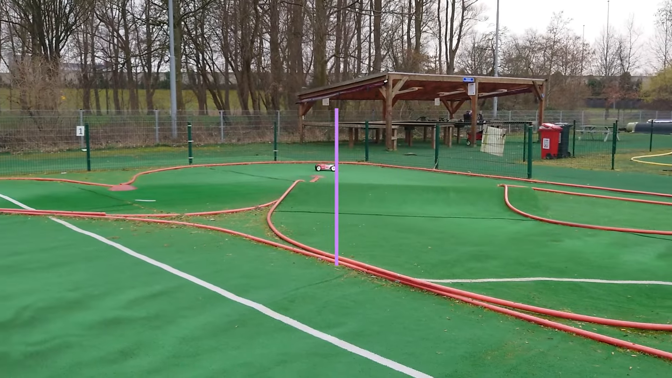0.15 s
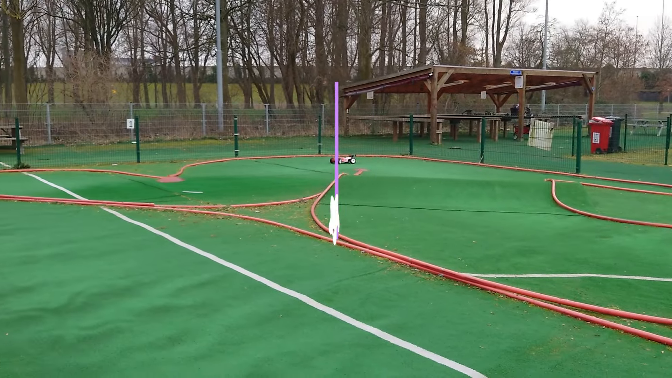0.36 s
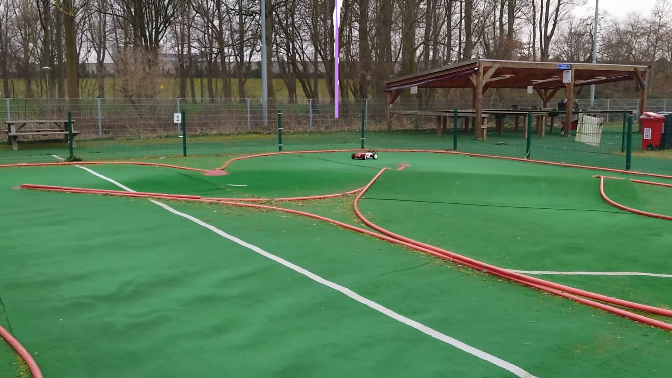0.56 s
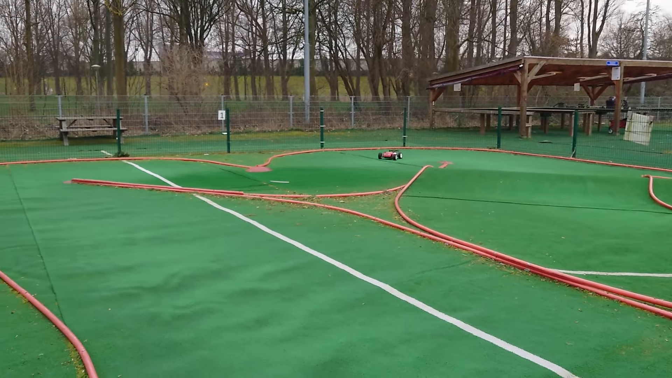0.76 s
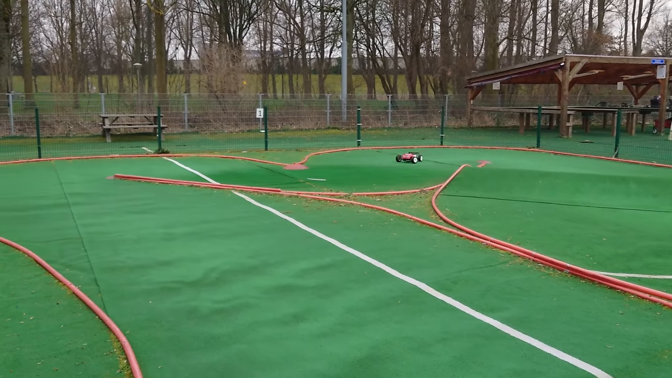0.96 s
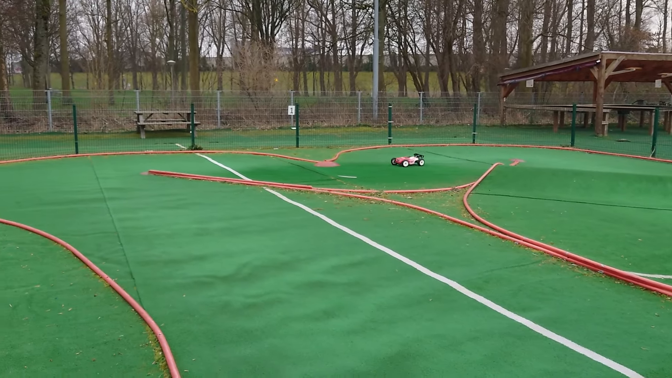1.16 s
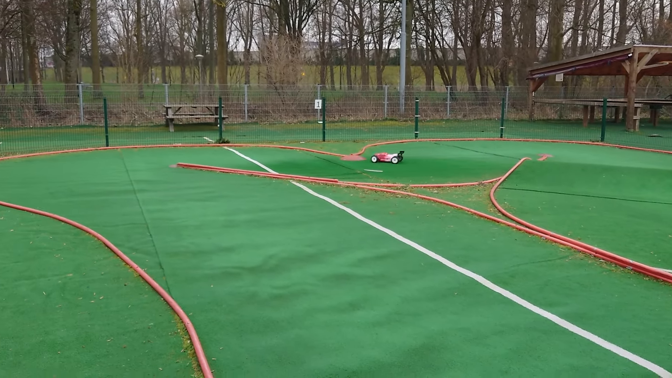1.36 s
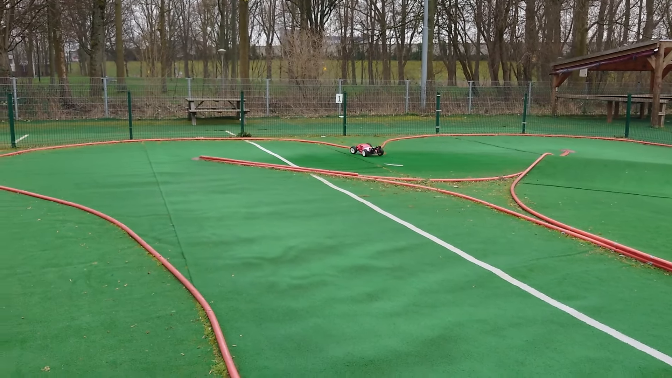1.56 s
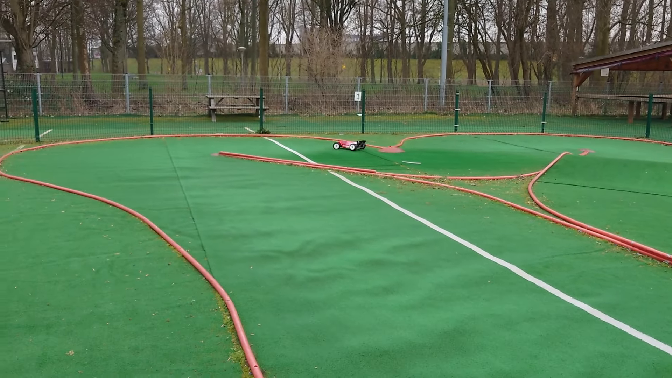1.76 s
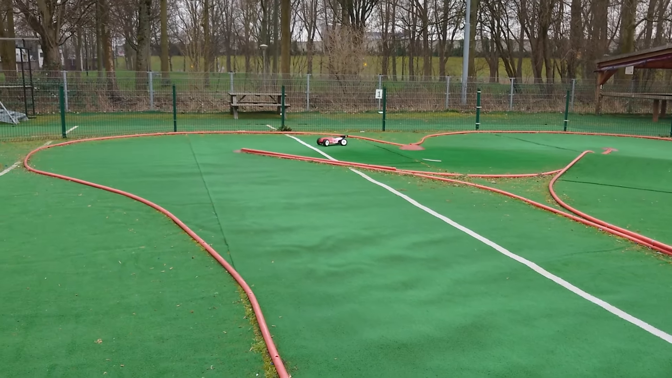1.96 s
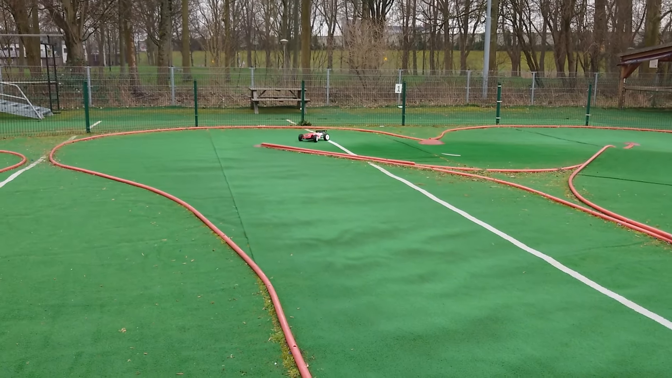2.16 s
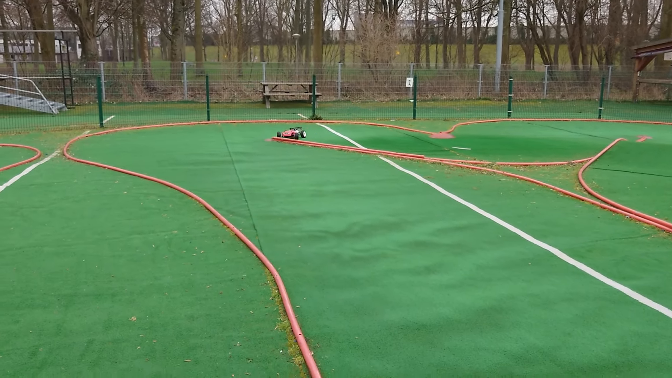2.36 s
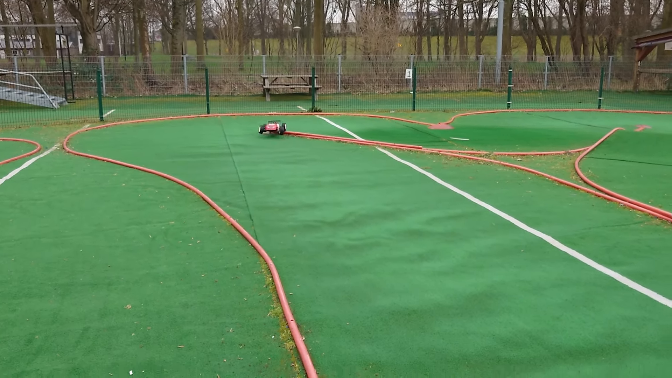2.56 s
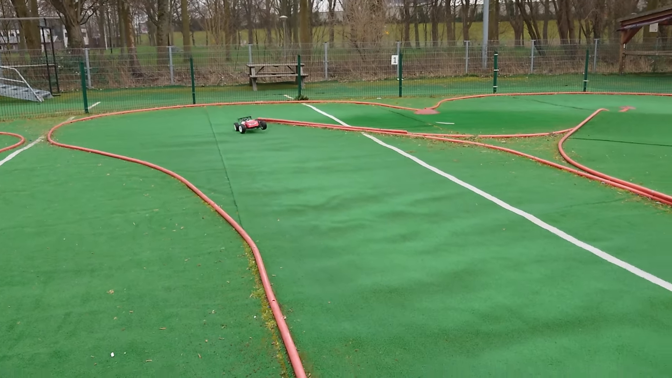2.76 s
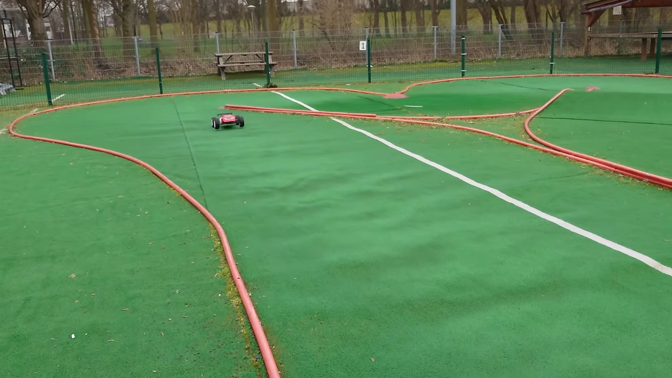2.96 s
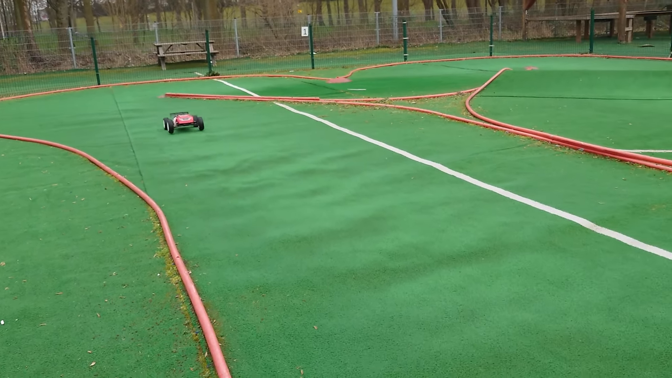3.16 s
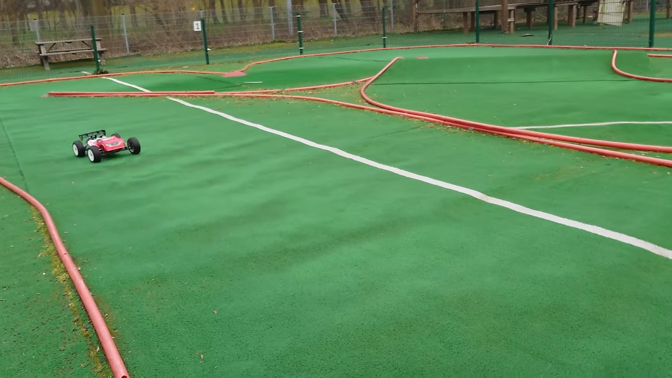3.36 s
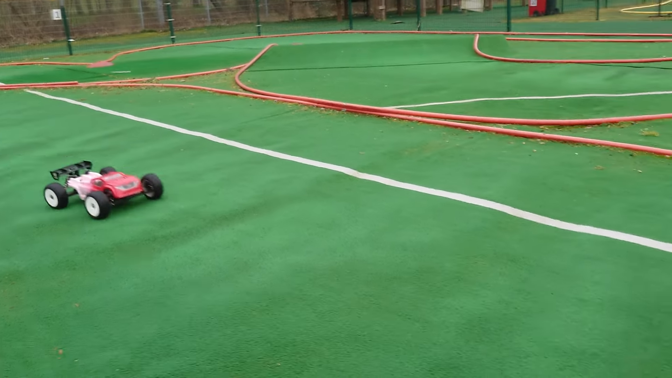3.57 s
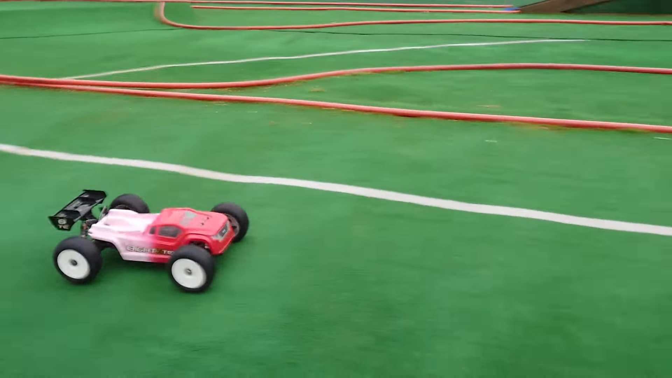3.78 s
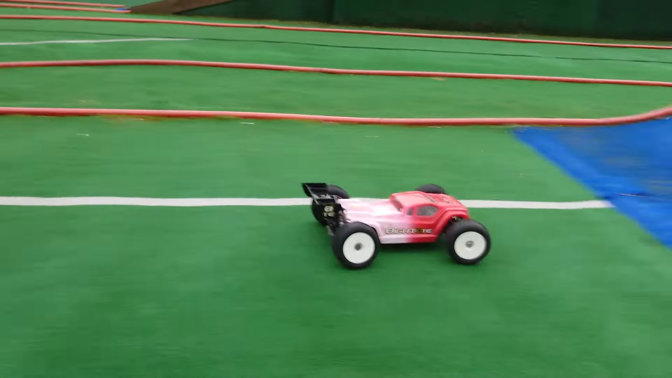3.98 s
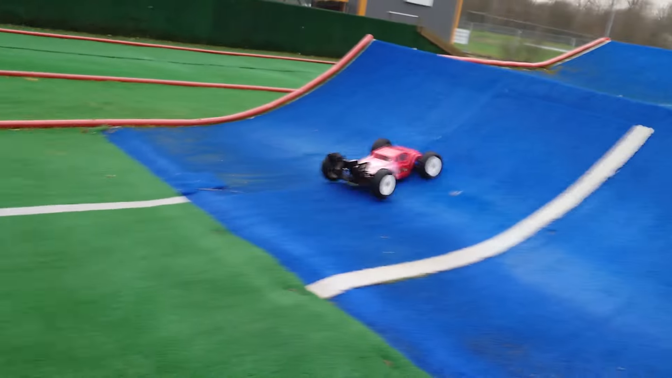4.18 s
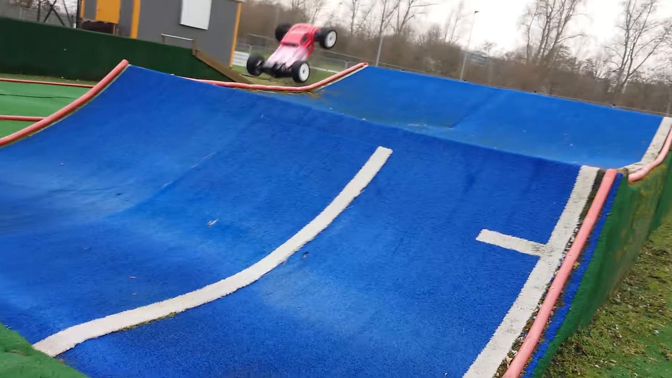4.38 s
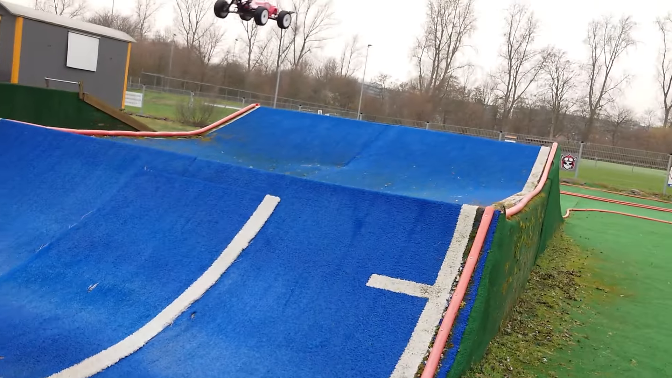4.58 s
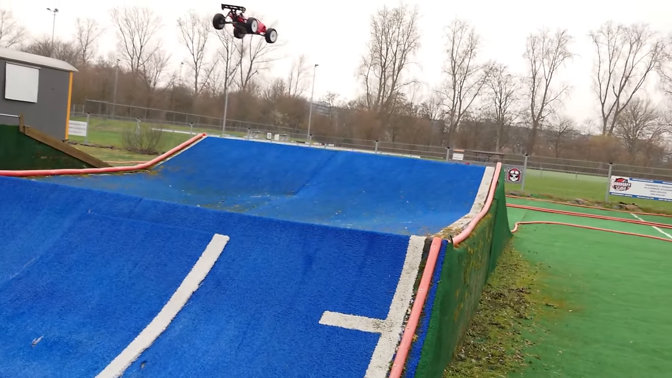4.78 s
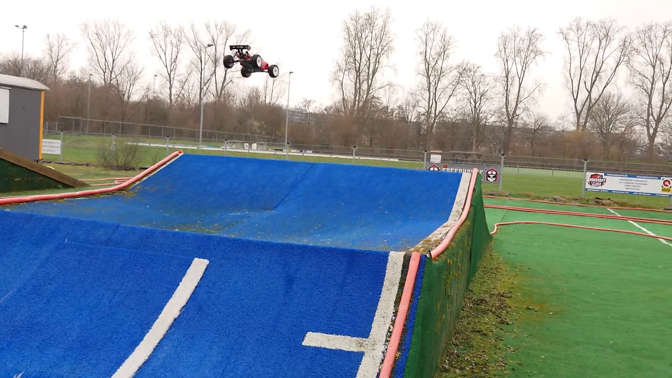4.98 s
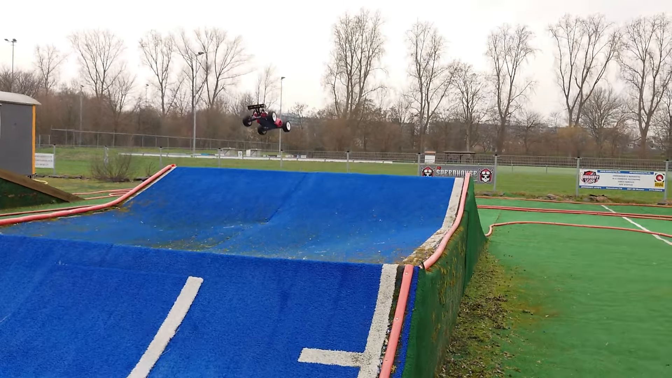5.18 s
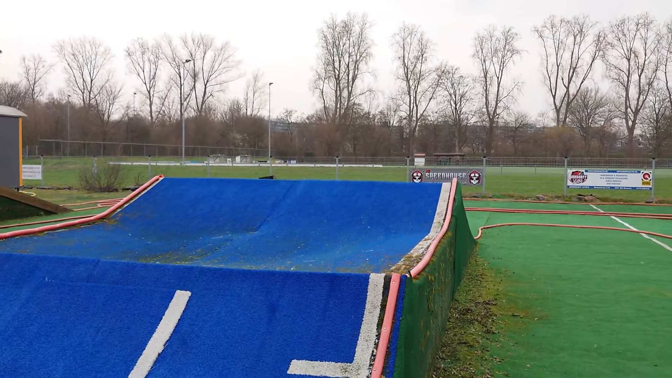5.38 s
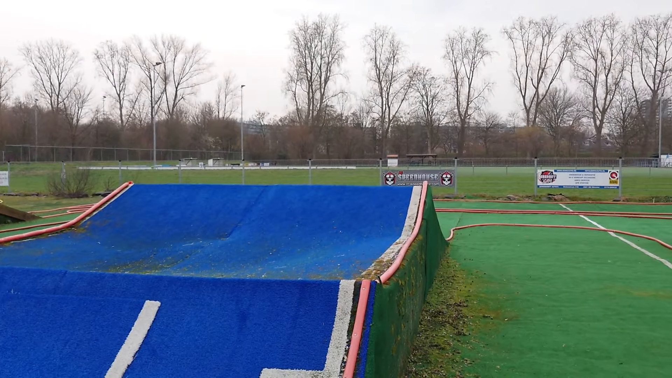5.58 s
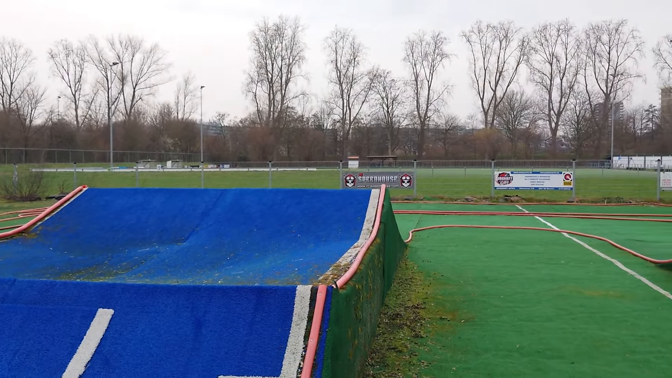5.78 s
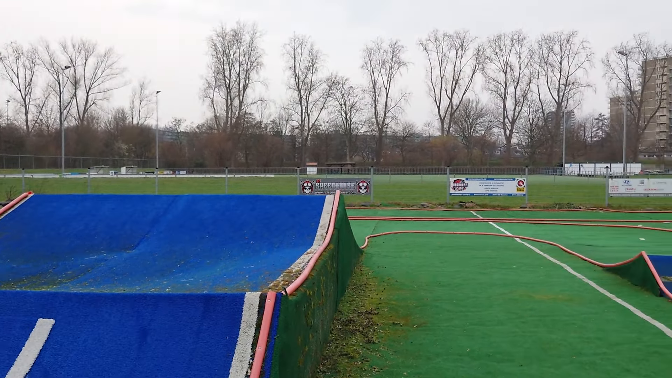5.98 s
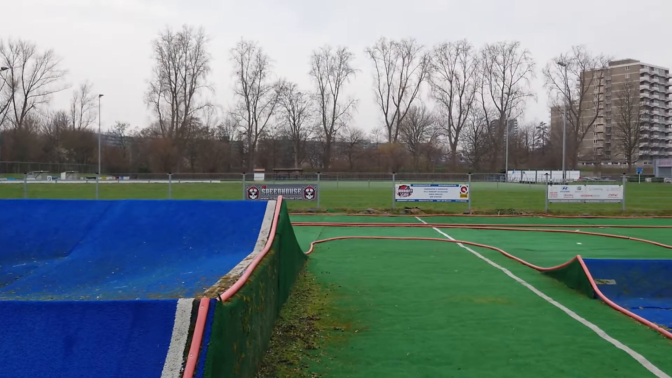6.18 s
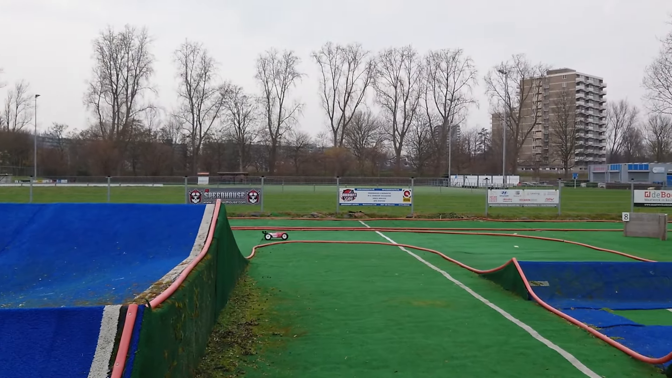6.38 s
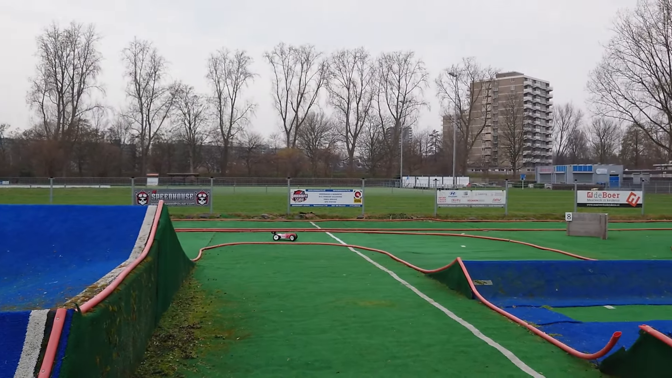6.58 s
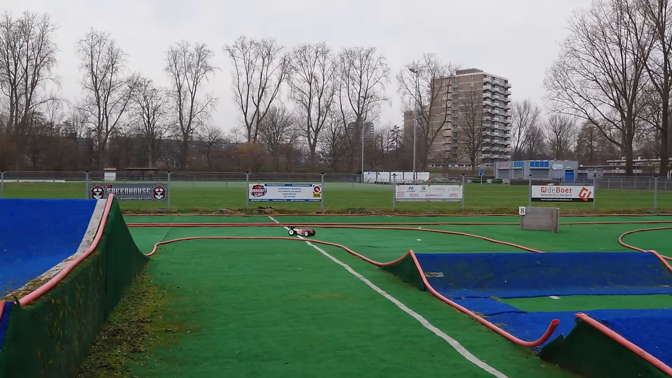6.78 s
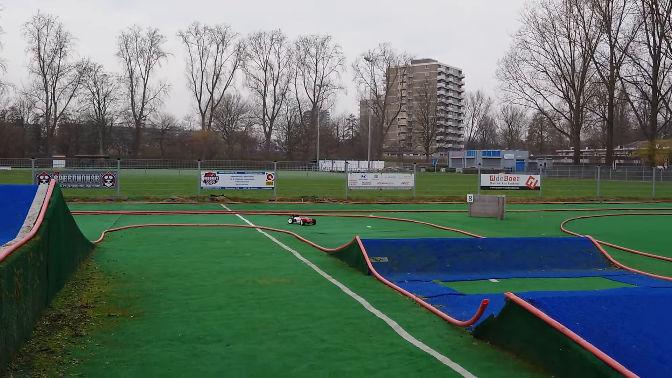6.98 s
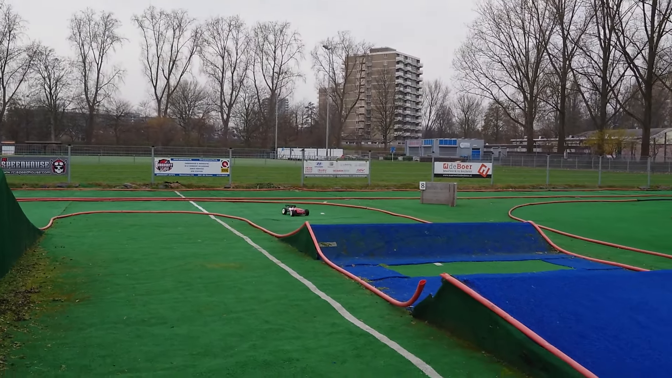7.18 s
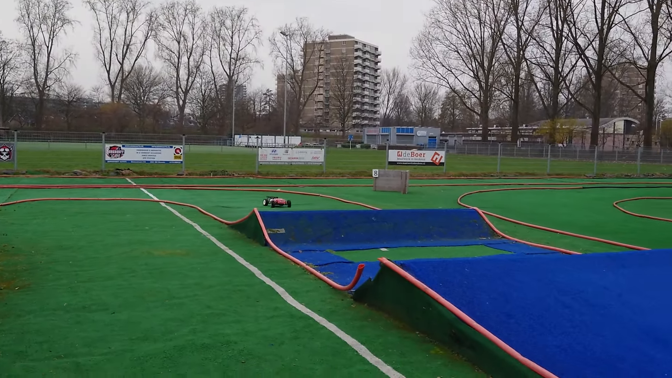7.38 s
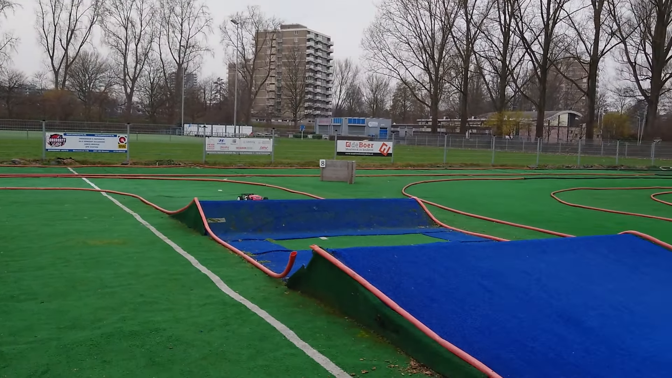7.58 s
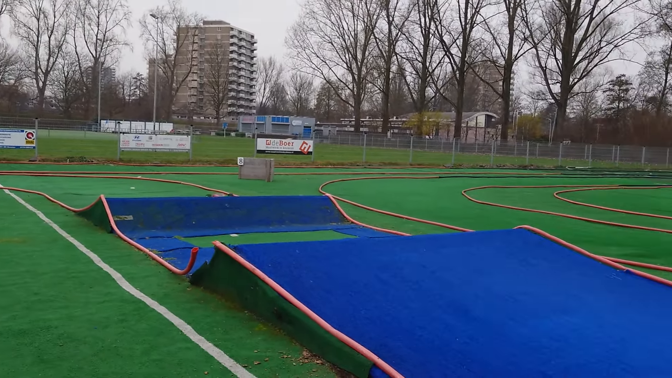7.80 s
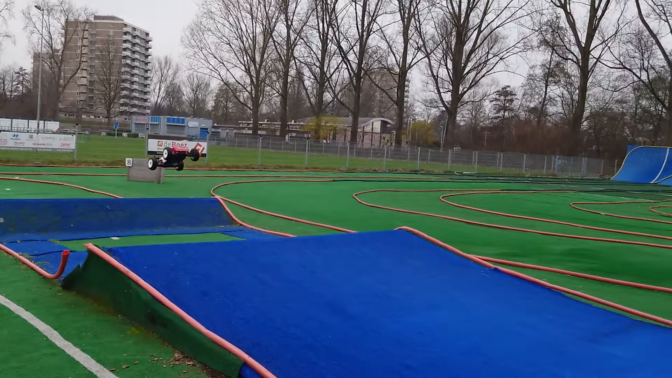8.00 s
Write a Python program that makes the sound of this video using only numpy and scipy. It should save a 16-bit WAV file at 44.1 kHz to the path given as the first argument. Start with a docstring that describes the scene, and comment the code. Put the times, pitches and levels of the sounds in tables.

```python
"""An electric model truck laps a carpeted outdoor track: it squirts through far corners, races past,
thumps up a wooden ramp, blips its motor in the air, lands and comes round again.
Its whine is gliding harmonics of the tooth rates; clicks and filtered grains make gears, shell and tyres.
Decaying modes ring the shell and ramp boards; shaped noise is the slap of landings and a distant town."""
import sys
import numpy as np
from scipy import signal
from scipy.fft import rfft, irfft, next_fast_len
from scipy.io import wavfile
from scipy.ndimage import map_coordinates

SR = 44100
rng = np.random.default_rng(int(sys.argv[2]) if len(sys.argv) > 2 else 0)


def wav_record(signal):
    """Record a signal, one row per channel, as 16-bit PCM in the file named by sys.argv[1]."""
    frames = np.transpose(np.atleast_2d(signal))
    bounded = np.clip(frames, -1, 1)
    # unit amplitude maps onto the largest positive 16-bit level
    quanta = np.round(bounded * 32767).astype(np.int16)
    wavfile.write(sys.argv[1], SR, quanta)


N = 354563
TIME = np.arange(N) / SR  # s

# Squeezes of throttle or brake, plus one short treble tick of the servo or suspension at 5.672 s. # Each row:
# start in seconds, length in seconds, pinion tooth rate from Hz, to Hz, # whine level in dB at the first rate,
# gear rattle level in dB at the last rate.
THROTTLE = [(-.06, 0.073, 2240, 2334, -68, -59.5), (0.403, 0.024, 1700, 1860, -52.5, -67),
            (.43, 0.018, 1650, 1584, -58, -70), (0.453, 0.03, 1694, 1998, -51, -65),
            (0.497, 0.028, 1810, 1947, -47.5, -63), (.535, 0.023, 2056, 1907, -61, -66),
            (.57, 0.14, 1767, 1933, -66.5, -62.5), (0.725, 0.05, 1792, 1894, -55, -57),
            (.778, 0.048, 2094, 2073, -57, -56.5), (0.83, 0.07, 2386, 2900, -52.5, -54),
            (.912, 0.13, 3370, 4866, -47, -45), (1.4, 0.096, 2485, 2267, -61, -92),
            (1.519, 0.057, 2252, 2410, -55, -57), (1.6, 0.029, 2500, 2687, -49.5, -57),
            (1.635, 0.097, 2896, 4080, -49, -48.5), (1.755, 0.066, 4110, 3674, -51, -54),
            (1.84, 0.011, 2062, 1715, -66, -65.5), (2.02, 0.027, 2118, 2284, -51, -57),
            (2.05, 0.1, 2965, 3890, -50, -53.5), (2.24, 0.017, 2456, 2560, -53, -58),
            (2.262, 0.03, 2950, 3195, -49, -54.5), (2.305, 0.065, 4203, 4825, -43.5, -48.5),
            (2.601, 0.29, 2903, 3480, -57, -51), (2.87, 0.044, 3722, 4107, -45.5, -50),
            (2.928, 0.063, 3636, 4730, -42, -40), (3.015, 0.054, 4420, 5200, -36, -37.5),
            (3.075, 0.1, 5797, 7300, -34.5, -35), (3.2, 0.12, 6500, 7350, -40, -34.5),
            (3.35, 0.062, 6670, 6230, -50, -44), (3.436, 0.035, 5313, 5716, -35.5, -34),
            (3.474, 0.049, 6010, 7076, -34, -28), (3.54, 0.099, 7540, 7130, -60, -34.5),
            (3.755, 0.023, 6215, 5880, -37.5, -44.5), (4.448, 0.035, 3130, 2647, -57, -46.5),
            (4.688, .014, 1451, 1438, -54, -40.5), (4.707, .03, 1447, 2400, -48, -39.5),
            (4.74, 0.041, 5840, 7150, -45.5, -49), (5.672, 0.015, 5140, 4840, -59, -50.5),
            (5.928, 0.14, 3140, 3395, -84, -61.5), (6.353, 0.11, 3885, 5220, -64, -52.5),
            (6.645, 0.1, 4140, 3827, -59, -60), (6.985, 0.023, 2758, 2550, -63, -58),
            (7.022, .025, 2900, 2590, -59, -62), (7.065, 0.018, 2870, 2556, -59, -58.5),
            (7.115, .05, 3403, 3603, -54, -55.5), (7.192, 0.021, 3020, 2826, -58, -54.5),
            (7.23, 0.25, 3404, 3693, -56.5, -55), (7.5, 0.097, 3844, 4250, -54, -50.5),
            (7.625, 0.049, 4340, 4720, -44, -48), (7.682, 0.078, 4940, 6340, -44.5, -48.5),
            (7.775, 0.036, 5200, 5475, -53, -52), (7.83, 0.13, 5720, 6480, -62, -40.5),
            (7.955, 0.032, 6400, 7190, -42, -30.5)]
ATTACK_S, WHINE_FALL_S, RATTLE_FALL_S = 0.003, 0.0024, 0.053  # rise time; time constants of the fades
RATTLE_RISE_S, RATTLE_LEAD_S = 0.018, 0.014  # the slack teeth begin to rattle just before they bite
CLIMB_DB = 10.5  # every swell climbs this far in one rise time
SPIN_UP_BEND = 1.25  # over 1: the motor gains speed fastest at first
COAST_OCTAVES_PER_S = 1.5
# As the motor speeds up, the torque drops and the rattle grows.
WHINE_DB_PER_OCTAVE, RATTLE_DB_PER_OCTAVE = -14, 21
SWAY_HZ = 60  # rms sway of the tooth rate
FLUTTER, FLUTTER_AT_HZ = .02, 7000  # rms share of flutter reached at this tooth rate
PINION_TEETH = 14

# How well the gearbox radiates a tone. Each row: frequency in Hz, level in dB.
GEARBOX = [(1500, 10), (2000, 9.5), (2750, 5.5), (3400, -9), (4500, -14), (5500, -5), (7000, -2),
           (8000, 15), (10200, -7), (12000, 0), (15000, -10)]
# Crown gear singing under a sudden load. Each row: start in seconds, length in seconds, level in dB.
GROWLS = [(2.905, .03, -42.5), (3.2, 0.1, -46), (3.478, 0.036, -31), (3.535, .025, -35), (7.1, 0.25, -54),
          (7.965, 0.058, -38)]
# Bright click of a worn tooth. Each row: frequency in Hz, relative dB per Hz.
TOOTH_CLICK = [(800, -19), (2000, -4), (4200, -9), (6000, 0), (8200, 7), (11000, -4), (16000, -11)]
# Loose gear rattle. Each row: frequency in Hz, relative dB per Hz.
GEAR_RATTLE = [(800, -23), (2000, 2), (3200, 4.5), (5000, 1), (6500, -1), (8300, 5), (11000, -4),
               (16000, -14)]
# Boost of the gears' top treble. Each row: time in seconds, gain in dB.
BITE = [(0, 6), (.6, 13.5), (1.1, 3), (2.2, 8), (3.4, -3), (4.7, 0.5), (5.2, -12.5), (6.3, 2.5), (7.3, 5),
        (7.9, -7.5)]
# Buzz of the plastic shell. Each row: frequency in Hz, relative dB per Hz.
SHELL_BUZZ = [(500, -31), (1050, -4.5), (1400, 1), (1750, 4), (2000, -0.5), (2400, -1.5), (3100, -14.5),
              (5000, -13), (10000, -27.5)]
# Modes of the plastic shell. Each row: frequency in Hz, relative level in dB, 60 dB decay in seconds.
SHELL_MODES = [(1583, 11.5, 0.025), (2400, 14, 0.025), (3270, 7, 0.01), (5640, 13, 0.0045),
               (7030, 9, 0.0072)]
# Tread on carpet. Each row: frequency in Hz, relative dB per Hz.
TYRE = [(100, -20), (200, -9.5), (350, 1.5), (480, -1), (600, -1.5), (800, 0.5), (1100, -18.5),
        (2000, -17.5), (5000, -39)]
SHELL_OVER_GEARS_DB, TYRES_OVER_GEARS_DB = 1, -11.5  # the drive also shakes the shell and the tyres
SHELL_BUZZ_DB = -6.5  # the shell passes on the clicks of the teeth
SLACK_SHARE = .65  # share of the drive that shakes the loose gear rattle

# Path of the car. Each row: time in seconds, distance in metres, lead of the left microphone in ms.
PATH = [(0, 14, 0.015), (.7, 28, -0.00042), (1.2, 13, -0.091), (1.6, 5.04, -0.013), (1.95, 15.8, 0.0047),
        (2.5, 14.4, 0.025), (3.1, 11.5, 0.096), (3.6, 2.25, 0.16), (4.05, 2.14, 0.02), (4.6, 2.8, 0.11),
        (5.2, 21.2, 0.06), (5.8, 27.5, 0.097), (6.45, 6.3, 0.084), (7.2, 14.2, 0.055), (8.04, 6.1, .12)]
ROLL_DB, ROLL_RATTLE_DB = -32.5, -33.5  # tyres and loose parts of the rolling car, scaled by 1 / metres
RATTLE_LOSS_DB_PER_M = 1.42  # the carpet soaks up the treble
# Time in the air. Each row: take-off in seconds, length in seconds.
JUMPS = [(4.5, 1)]
LIFT_S, FREE_SPIN_DELAY_S = 0.12, 0.246  # wheels leave the ground; the motor is blipped and they spin on
FREE_RATTLE_DB, FREE_RING_DB = -49.5, -53.5
# Suspension squashed by bumps, ramps and the landing. Each row: start in seconds, length in seconds,
# tyre roar level in dB, rattle level in dB.
JOLTS = [(2.026, 0.083, -50.5, -55.5), (2.277, 0.084, -55, -56), (2.555, 0.018, -41.5, -44),
         (2.614, 0.017, -40.5, -46.5), (3.878, 0.028, -35.5, -37.5), (3.932, 0.062, -33, -42),
         (4.156, 0.038, -31.5, -44.5), (4.275, 0.017, -33, -40), (4.298, 0.022, -24.5, -34.5),
         (4.374, 0.067, -38, -63), (4.423, 0.043, -40, -42.5), (5.525, 0.026, -64, -48),
         (5.559, 0.08, -40.5, -52), (5.91, 0.14, -50.5, -64), (6.375, 0.076, -47, -60),
         (7.7, 0.25, -55, -49.5)]
JOLT_RISE_S, JOLT_FALL_S = 0.014, 0.028
SHELL_OVER_JOLT_DB, RING_OVER_JOLT_DB = 6, -26  # buzz and ring of the shell against the rattle
RING_OVER_DRIVE_DB = 0

# The motor's windings sing under hard braking or from a stall. Each row: start in seconds,
# length in seconds, from Hz, to Hz, level in dB.
CHIRPS = [(1.828, 0.023, 2048, 1706, -46), (2.021, .016, 2150, 2270, -41), (4.458, .016, 3102, 2720, -38),
          (4.481, 0.02, 3560, 3510, -38), (4.522, .014, 3400, 3360, -52), (4.689, .016, 1583, 1445, -39),
          (4.707, 0.00967, 1429, 1532, -21.5), (4.723, 0.011, 1947, 2400, -32.5),
          (7.195, .015, 2983, 2896, -58)]
# A panel of the shell drones while the drive holds its speed. Each row: start in seconds,
# length in seconds, frequency in Hz, level in dB.
DRONES = [(.84, 0.29, 1234, -55), (3.1, .24, 1334, -48), (3.875, 0.517, 1733, -47.5),
          (4.516, 0.032, 1758, -41), (4.728, 0.048, 1500, -51), (7.241, .4, 1382, -55.5),
          (7.659, .3, 1328, -48.5)]
DRONE_CHANGES_HZ = 190  # sets how wide each drone spreads round its pitch
# Tyres squealing hoarsely in tight turns. Each row: start in seconds, length in seconds,
# from Hz, to Hz, level in dB.
SQUEALS = [(2.052, .025, 649, 700, -39.5), (2.095, .06, 720, 800, -42.5), (2.272, .055, 660, 850, -42.5),
           (2.345, .04, 770, 800, -47), (2.435, .02, 1097, 850, -46), (6.68, .12, 722.6, 780, -50.5)]
# The shell clacks against its posts. Each row: time in seconds, frequency in Hz, starting level in dB.
CLACKS = [(3.324, 1250, -22), (4.512, 1417, -26), (5.562, 2050, -31), (5.597, 2260, -35),
          (5.598, 2900, -39), (5.613, 2250, -29), (5.627, 1985, -28), (5.649, 2082, -36),
          (6.557, 1205, -36)]

# Chassis knocks. Each row: time in seconds, crack level in dB, deck thump level in dB (both before trims).
KNOCKS = [(2.569, -18, -49), (2.583, -45, -44), (2.626, -25, -61), (2.679, -24.5, -36.5), (3.504, -15, -62),
          (3.522, -12.5, -61), (3.896, -19.5, -51), (3.963, -40, -39), (4.195, -36, -23.5),
          (4.315, -9, -45), (4.326, -14, -31), (4.382, -38, -30.5), (5.597, -13.5, -29), (5.613, -34, -20),
          (5.629, -32, -44), (6.557, -36, -65)]
# Crack of the chassis. Each row: frequency in Hz, gain in dB.
CRACK = [(80, 3), (200, -10.0), (350, 11.0), (500, 14.5), (750, 2.0), (1100, 7.0), (1700, 3.5),
         (2300, 3.0), (3300, -22.0), (7000, -10.5), (15000, -42)]
# Modes of the hollow ramp boards. Each row: frequency in Hz, level in dB, 60 dB decay in seconds.
DECK = [(32, -2, 0.99), (53.4, -23, 0.69), (73.1, -2, 0.83), (113.5, -3, 0.13), (152, -6.5, 0.22),
        (340, -15, 0.45)]
# Wheels drumming on the boards. Each row: start in seconds, length in seconds, level in dB.
BOARD_RUNS = [(3.8, 0.47, -39), (4.24, 0.14, -27.5), (5.575, 0.029, -37), (5.67, 0.2, -50)]
BOARD_RISE_S, BOARD_FALL_S = 0.043, 0.046
# Tone of the drumming. Each row: frequency in Hz, relative gain in dB.
DRUMMING = [(15, -3.5), (30, -8.0), (70, -2.0), (110, -3.0), (200, -9.0), (330, -16.5),
            (600, -18.0), (2000, -59)]
# Small clicks at the microphones. Each row: time in seconds, level in dB before a trim.
CLICKS = [(0.0438, -26.5), (0.0714, -32), (0.1503, -22.5), (0.156, -32), (0.1937, -31), (0.343, -42),
          (0.638, -36)]
# Tone of those clicks. Each row: frequency in Hz, gain in dB.
CLICK_TONE = [(500, -12), (3500, -16.0), (7000, -3.5), (15000, -14)]

# Tone of the outdoor echo. Each row: frequency in Hz, gain in dB.
ECHO = [(200, 0.0), (1200, -4.5), (4000, 4), (14000, 3.0)]
# Distant town. Each row: frequency in Hz, relative dB per Hz.
TOWN = [(12, -6), (25, 2.5), (65, 0), (130, -7.5), (240, -22.5), (400, -24.5), (750, -18.5), (1300, -23),
        (2000, -29), (2500, -34.5), (3300, -44), (5000, -51.5), (15000, -64)]
# Stereo width of the town. Each row: frequency in Hz, gain of the side signal in dB.
TOWN_WIDTH = [(60, -18), (150, -18.0), (300, -9.0), (600, -3.5), (1200, 3.0), (8000, -4.5)]
# Town level. Each row: time in seconds, gain of the low rumble in dB, gain of the traffic hiss in dB.
TOWN_LEVEL = [(0, -40.5, -42), (2.5, -39.5, -41), (3.3, -43.5, -36), (5.3, -44, -44.5), (6.2, -39.5, -39.5),
              (6.8, -41.5, -41), (7.3, -48, -41), (8.04, -42.5, -42.5)]
# Colour of the microphone ports. Each row: frequency in Hz, left gain in dB, right gain in dB.
PORTS = [(1150, -2.5, -3), (2500, 0.5, 3), (3440, 2.5, 3.5), (5200, 1.5, 5), (6930, 12, 7),
         (7440, -5.5, 9.5), (8820, -20.5, -3.5), (10100, 6, -10.5), (10600, -0.5, 4.5), (11800, 3.5, 2.5),
         (15500, 6, 1)]
TOP_HZ = 15900  # top of the microphones' band


def car():
    """One motor drives all the layers: meshing gears, loose teeth, a shaken shell and slapping tread."""
    hz, whine, drive = motor()
    tyre_gain, gear_gain, shell_gain, ring_gain = shaking(drive)
    speed, fluttering = unsteady(hz)
    turn = np.sin(2 * np.pi * np.cumsum(fluttering) / SR / PINION_TEETH)
    contacts = tooth_contacts(speed)
    chatter = (1 + .25 * turn) * undb(walk(130) + 1.3 * walk(30))
    tones = pinion(fluttering, whine, turn) + crown(speed)
    noises = gears(contacts, drive, gear_gain, chatter) + shell(contacts, drive, shell_gain, chatter)
    return tones + noises + shell_ring(ring_gain) + tyres(tyre_gain)


def motor():
    """Each row of THROTTLE pulls the motor to a new speed, then it coasts down: tooth rate, whine and rattle."""
    rate, whine, rattle = np.full(N, float(THROTTLE[0][2])), np.zeros(N), np.zeros(N)
    for s, length, from_hz, to_hz, whine_db, rattle_db in THROTTLE:
        near = slice(*np.searchsorted(TIME, [s - .3, s + 1.3]))
        t = TIME[near]
        progress = np.clip((t - s) / length, 0, 1)
        hz = to_hz + (from_hz - to_hz) * (1 - progress) ** SPIN_UP_BEND
        coast = 2 ** (-COAST_OCTAVES_PER_S * np.maximum(t - s - length, 0))
        new_rate = np.where(t >= s, hz * coast, rate[near])
        slowing = np.minimum(np.log2(new_rate / rate[near]), 0)
        braking = undb(RATTLE_DB_PER_OCTAVE * slowing)  # stills the earlier rattle
        torque = undb(whine_db + WHINE_DB_PER_OCTAVE * np.log2(hz / from_hz))
        shake = undb(rattle_db + RATTLE_DB_PER_OCTAVE * np.log2(hz / to_hz))
        pull = swell(s, length, ATTACK_S, WHINE_FALL_S, t)
        loose = swell(s - RATTLE_LEAD_S, length + RATTLE_LEAD_S, RATTLE_RISE_S, RATTLE_FALL_S, t)
        rate[near] = new_rate
        whine[near] = np.maximum(whine[near], torque * pull)
        rattle[near] = np.maximum(rattle[near] * braking, shake * loose)
    return rate, whine, rattle


def shaking(drive):
    """How hard drive, rolling, jolts and free spin excite the tyres, gears, shell and the shell's modes."""
    metres, _ = curves(PATH)
    air = sum(swell(s, length, LIFT_S, JOLT_FALL_S) for s, length in JUMPS)
    spin = sum(swell(s + FREE_SPIN_DELAY_S, length - FREE_SPIN_DELAY_S, RATTLE_RISE_S, RATTLE_FALL_S)
               for s, length in JUMPS)
    rolling = (1 - air) / metres
    squash = swells([(s, length, db) for s, length, db, _ in JOLTS], JOLT_RISE_S, JOLT_FALL_S)
    clatter = swells([(s, length, db) for s, length, _, db in JOLTS], JOLT_RISE_S, JOLT_FALL_S)
    loose = together(clatter, rolling * undb(ROLL_RATTLE_DB - RATTLE_LOSS_DB_PER_M * metres))
    tyre_gain = together(rolling * undb(ROLL_DB), squash, drive * undb(TYRES_OVER_GEARS_DB))
    gear_gain = together(SLACK_SHARE * drive, loose, spin * undb(FREE_RATTLE_DB))
    shell_gain = together(drive * undb(SHELL_OVER_GEARS_DB), loose * undb(SHELL_OVER_JOLT_DB))
    ring_gain = together(loose * undb(RING_OVER_JOLT_DB), spin * drive * undb(RING_OVER_DRIVE_DB),
                         spin * undb(FREE_RING_DB))
    return tyre_gain, gear_gain, shell_gain, ring_gain


def unsteady(hz):
    """Bumps sway the speed; play in the teeth adds a flutter that roughens the whine at top speed."""
    speed = hz + SWAY_HZ * walk(45)
    flutter = .008 * walk(500) + FLUTTER * (hz / FLUTTER_AT_HZ) ** 2 * walk(1500)
    return speed, speed + hz * flutter


def pinion(hz, whine, turn):
    """The pinion whines at its tooth rate; it runs out of true, so its load swings once a turn."""
    swing = 1 + .35 * walk(40) * turn + .25 * walk(700)
    tone = mesh(hz, [0, -8, -12, -10, -14, -13], 3) * swing
    return rebound(colour(tone * whine, GEARBOX), t60=.022, share_db=-8)


def crown(speed, reduction=4.7):
    """The slower crown gear growls as a sudden load comes on."""
    tone = mesh(speed / reduction * (1 + .035 * walk(250)), [0, -18], 3)
    return tone * swells(GROWLS, rise=0.0086, fall=0.0069)


def tooth_contacts(speed):
    """Worn teeth click in patterns that repeat after a few contacts and after a full turn."""
    few = worn_gear(speed * (1 + .012 * walk(200)), count=5)
    full_turn = worn_gear(speed, count=PINION_TEETH)
    return rebound(few + .55 * full_turn, t60=.012, share_db=-7)


def gears(contacts, drive, gear_gain, chatter, trim_db=-1):
    """Under load the teeth click amid a loose rattle, while the top treble comes and goes."""
    buzz = unit(colour(contacts, TOOTH_CLICK))
    rattle = unit(colour(grains(12000, 0.5), GEAR_RATTLE))
    sound = (.9 * buzz * drive + .68 * rattle * gear_gain) * chatter
    treble = signal.sosfiltfilt(signal.butter(2, 7500, "high", fs=SR, output="sos"), sound)
    return (sound + treble * (undb(curves(BITE)[0]) - 1)) * undb(trim_db)


def shell(contacts, drive, shell_gain, chatter, trim_db=-5):
    """The plastic shell buzzes with tiny impacts and passes on the clicks of the teeth."""
    buzz = unit(colour(grains(3500, 3) * chatter, SHELL_BUZZ)) * shell_gain * undb(trim_db)
    return buzz + unit(colour(contacts, SHELL_BUZZ)) * drive * undb(SHELL_BUZZ_DB)


def shell_ring(ring_gain):
    """Random taps set off the short, decaying modes of the shell."""
    ringing = unit(signal.fftconvolve(grains(3400, 2.7), modes(SHELL_MODES))[:N])
    return ringing * ring_gain * undb(2.5 * walk(25))


def tyres(tyre_gain):
    """Tread slaps the carpet in countless small, uneven impacts."""
    return unit(colour(grains(1400, 2.2), TYRE)) * tyre_gain


def mesh(hz, levels_db, flicker_db):
    """Harmonics of a tooth rate; the overtones flicker more than the fundamental as the load shifts."""
    phase = 2 * np.pi * np.cumsum(hz) / SR
    out = 0
    for k, db in enumerate(levels_db, 1):
        audible = np.clip((TOP_HZ - k * hz) / 1000 + 1, 0, 1)  # fades out over 1 kHz above the top
        flicker = flicker_db * (.7 if k == 1 else 1) * walk(70)
        out = out + audible * undb(db + flicker) * np.sin(k * phase)
    return unit(out)


def worn_gear(hz, count, scatter=0.3):
    """Clicks in a pattern that repeats after count contacts: uneven overtones that glide with the speed."""
    passed = np.cumsum(hz) / SR
    tooth = np.arange(int(passed[-1]))
    offset, size = rng.uniform(-1.03, 1, count), rng.choice([-1, 1], count)
    at = np.interp(tooth + offset[tooth % count], passed, np.arange(N))
    sizes = size[tooth % count] * (1 + scatter * rng.standard_normal(len(tooth)))
    # each click is shared between the two nearest samples
    sample, part = at.astype(int), at % 1
    early = np.bincount(sample, sizes * (1 - part), N + 1)
    late = np.bincount(sample + 1, sizes * part, N + 1)
    return unit((early + late)[:N] / np.sqrt(hz))


def rebound(x, t60, share_db):
    """Sound bounces about under the shell, so a gliding tone swells and fades as it goes."""
    tail = rng.standard_normal(SR) * ring(t60)
    bounced = signal.fftconvolve(x, tail / np.linalg.norm(tail))[:N]
    return (x + undb(share_db) * bounced) / np.hypot(1, undb(share_db))


def chirps(rise=0.0048, fall=0.0018):
    """A surge of current makes the motor's windings sing a nearly pure note."""
    note = mesh(glides(CHIRPS) * (1 + .01 * walk(500)), [0, -24], 1.5)
    return note * swells([(s, length, db) for s, length, _, _, db in CHIRPS], rise, fall)


def drones(rise=0.015, fall=0.022):
    """Narrow, unsteady resonances of the shell's panels: tones that wander in strength and phase."""
    shaken = walk(DRONE_CHANGES_HZ) + 1j * walk(DRONE_CHANGES_HZ)
    out = np.zeros(N)
    for s, length, hz, db in DRONES:
        tone = np.real(shaken * np.exp(2j * np.pi * hz * TIME))
        out += tone * undb(db) * swell(s, length, rise, fall)
    return out


def squeals(rise=0.0058, fall=0.012):
    """The tread sticks and slips on the carpet at an unsteady rate."""
    slip = mesh(glides(SQUEALS) * (1 + .1 * walk(350)), [0, -15, -17], 3)
    return slip * swells([(s, length, db) for s, length, _, _, db in SQUEALS], rise, fall)


def clacks(t60=0.02):
    """Short hollow knocks of the plastic shell, each a single decaying mode."""
    s, hz, level_db = np.transpose(CLACKS)
    return strike(s, undb(level_db), [modes([(f, 0, t60)]) for f in hz])


def knocks(crack_db=-10, thump_db=-3):
    """The chassis slaps the ground with a burst of noise and the boards below boom in their modes."""
    s, level_db, deck_db = np.transpose(KNOCKS)
    slaps = rng.standard_normal((len(s), SR)) * ring(.045)
    cracks = colour(strike(s, undb(level_db + crack_db), slaps), CRACK)
    thumps = strike(s, undb(deck_db + thump_db), [modes(DECK)] * len(s))
    return cracks, thumps + drumming()


def drumming():
    """Wheels running over the boards drum on them in small, uneven bumps."""
    bumps = grains(1200, 2) * undb(3 * walk(50))
    return unit(colour(bumps, DRUMMING)) * swells(BOARD_RUNS, BOARD_RISE_S, BOARD_FALL_S)


def clicks(t60=0.0052, click_db=-6):
    """Dry plastic ticks close to the microphones: very short bursts of noise."""
    s, level_db = np.transpose(CLICKS)
    ticks = strike(s, undb(level_db + click_db), rng.standard_normal((len(s), SR)) * ring(t60))
    return colour(ticks, CLICK_TONE)


def outdoors(x, casing_ms=0.17, casing=0.56, echo_db=-9, echo_t60=0.16):
    """Sound reaches the two ports in turn, once more round the casing, and scatters off ramps and trees."""
    _, lead_ms = curves(PATH)
    right = delay(x, lead_ms)
    glance = delay(right, casing_ms)
    direct = np.array([x, (right + casing * glance) / np.hypot(1, casing)])
    build_up = np.minimum(TIME[:SR] / 0.19, 1)
    scatter = rng.standard_normal((2, SR)) * ring(echo_t60) * build_up
    scatter /= np.sqrt(np.sum(scatter ** 2) / 2)
    echo = signal.fftconvolve(x[None], scatter, axes=1)[:, :N]
    return direct + undb(echo_db) * colour(echo, ECHO)


def town():
    """Far traffic and light air: the bass is shared by both ports, the hiss is diffuse."""
    mid, side = colour(rng.standard_normal((2, N)), TOWN)
    side = colour(side, TOWN_WIDTH)
    both = (mid + side * np.array([[1], [-1]])) / np.std(mid)
    rumble = signal.sosfiltfilt(signal.butter(2, 250, "low", fs=SR, output="sos"), both)
    hiss = both - rumble
    rumble_db, hiss_db = curves(TOWN_LEVEL)
    return (rumble * undb(rumble_db) + hiss * undb(hiss_db)) * undb(.7 * walk(7))


def swell(start, length, rise, fall, time=TIME):
    """Envelope climbing in dB from before the start to full one rise after it; it fades after its length."""
    t = time - start
    climb_db = CLIMB_DB * np.clip(t / rise - 1, -8, 0)
    return undb(climb_db) * np.exp(-np.clip((t - length) / fall, 0, 30))


def swells(rows, rise, fall):
    """Joint envelope of (start, length, dB) events."""
    return together(*(undb(db) * swell(s, length, rise, fall) for s, length, db in rows))


def together(*gains):
    """Level of unrelated sounds heard at once."""
    return np.sqrt(sum(g ** 2 for g in gains))


def glides(rows):
    """Pitch through (start, length, from Hz, to Hz, dB) events."""
    points = []
    for s, length, from_hz, to_hz, _ in rows:
        points += [(s, from_hz), (s + length, to_hz)]
    return curves(points)[0]


def curves(table):
    """Each column of a table, joined by straight lines in time."""
    s, *columns = np.transpose(table)
    return [np.interp(TIME, np.sort(s), c) for c in columns]


def walk(rate):
    """Smooth random wander of rms 1, drawn anew rate times a second."""
    fine = signal.resample_poly(rng.standard_normal(int(rate * N / SR) + 2), 4, 1)
    return unit(np.interp(TIME * rate * 4, np.arange(len(fine)), fine))


def grains(rate, spread_db):
    """Random tiny impacts of uneven size, on average rate a second."""
    hit = rng.random(N) < rate / SR
    return hit * rng.standard_normal(N) * undb(spread_db * rng.standard_normal(N))


def modes(table):
    """Ring of a set of modes after one tap."""
    return sum(undb(db) * ring(t60) * np.sin(2 * np.pi * hz * TIME[:SR]) for hz, db, t60 in table)


def ring(t60):
    """One second of exponential decay that drops 60 dB in t60 seconds."""
    return np.exp(-np.log(1000) * TIME[:SR] / t60)


def strike(times, gains, responses):
    """Place one response at each time."""
    out = np.zeros(N + SR)
    for s, gain, response in zip(times, gains, responses):
        start = int(np.clip(s * SR, 0, N - 1))
        out[start:start + SR] += gain * response
    return out[:N]


def delay(x, ms):
    """Delay by a fixed or moving number of milliseconds."""
    return map_coordinates(x, [np.arange(N) - ms * SR / 1000], order=3)


def colour(x, points):
    """Causal minimum-phase filter with the given (Hz, dB) outline, made by folding its cepstrum."""
    hz, db = np.transpose(points)
    size = next_fast_len(N + 8192, real=True)
    freq = np.maximum(np.fft.rfftfreq(size, 1 / SR), 1)
    outline = undb(np.interp(np.log(freq), np.log(hz), db))
    cepstrum = irfft(np.log(outline), size)
    cepstrum[1:size // 2] *= 2
    cepstrum[size // 2 + 1:] = 0
    return irfft(rfft(x, size) * np.exp(rfft(cepstrum)), size)[..., :N]


def undb(db):
    """Decibels to gain."""
    return 10 ** (np.asarray(db) / 20)


def unit(x):
    """Scale to rms 1."""
    return x / np.sqrt(np.mean(x ** 2))


def scene():
    """The car in the open air, with the boom of the boards, close clicks and the town added."""
    cracks, boom = knocks()
    truck = car() + chirps() + drones() + squeals() + clacks() + cracks
    return outdoors(truck) + boom + clicks() + town()


def record(dry):
    """Each microphone port colours the treble in its own way; a steep filter cuts the top."""
    ports = np.array(PORTS)
    heard = np.array([colour(x, ports[:, [0, k + 1]]) for k, x in enumerate(dry)])
    return signal.sosfilt(signal.ellip(10, .2, 80, TOP_HZ, fs=SR, output="sos"), heard)


dry = scene()
out = record(dry)
wav_record(out)
```